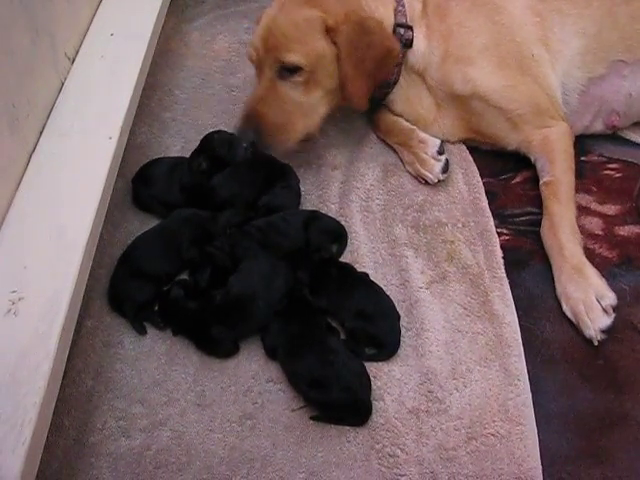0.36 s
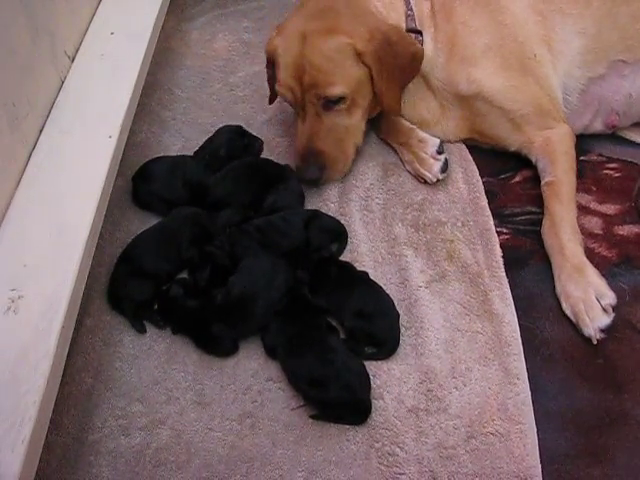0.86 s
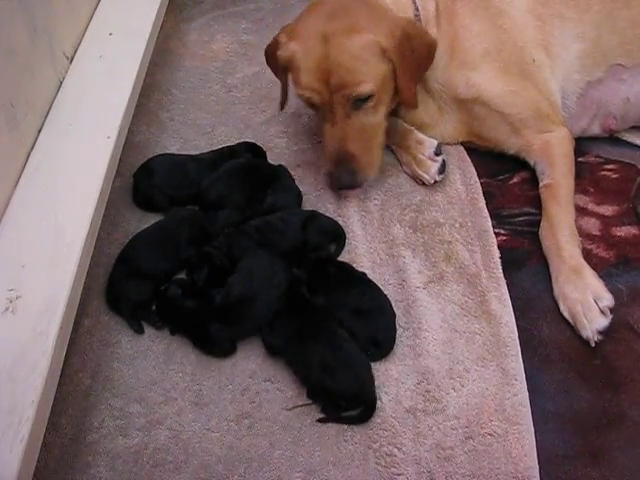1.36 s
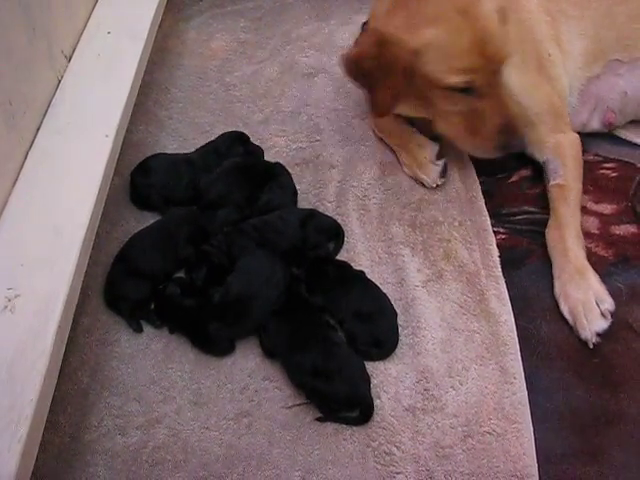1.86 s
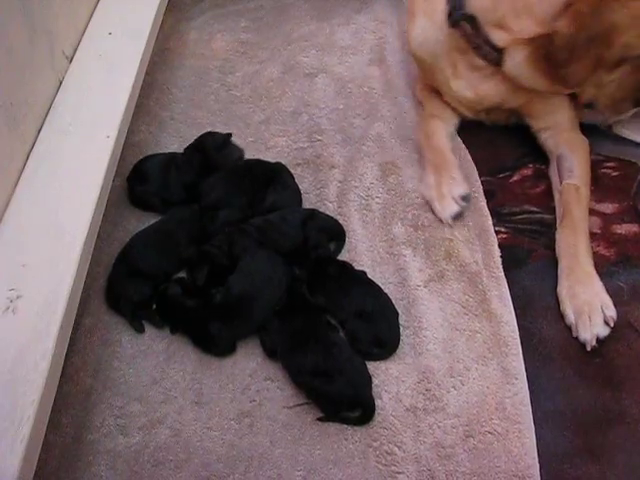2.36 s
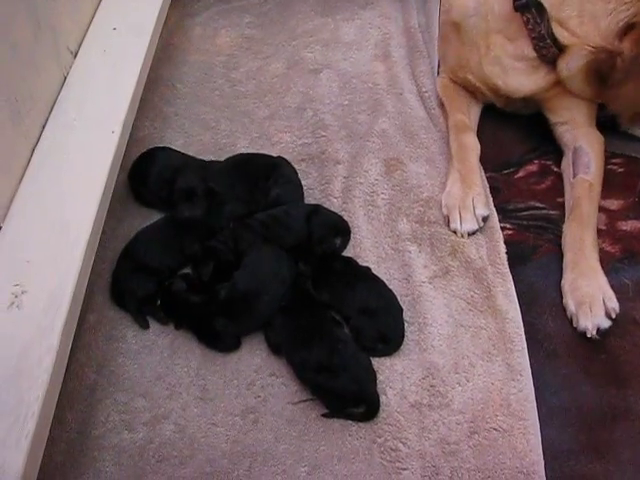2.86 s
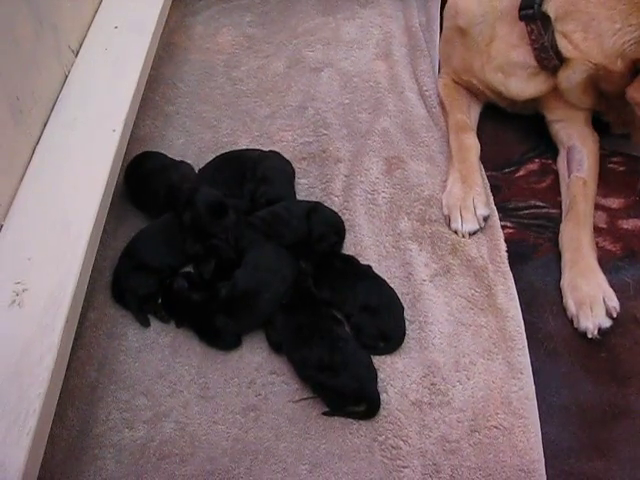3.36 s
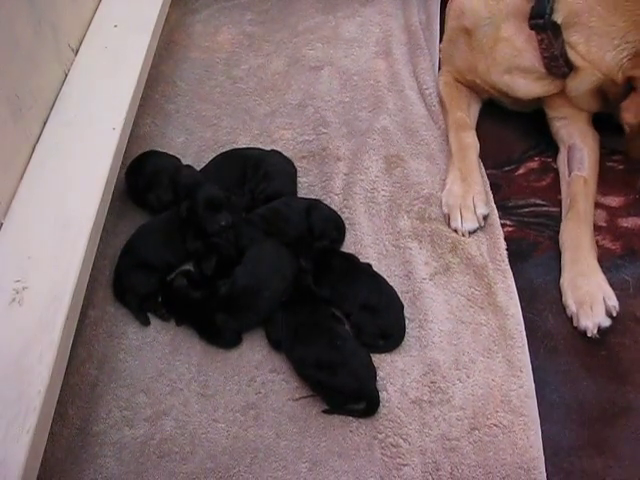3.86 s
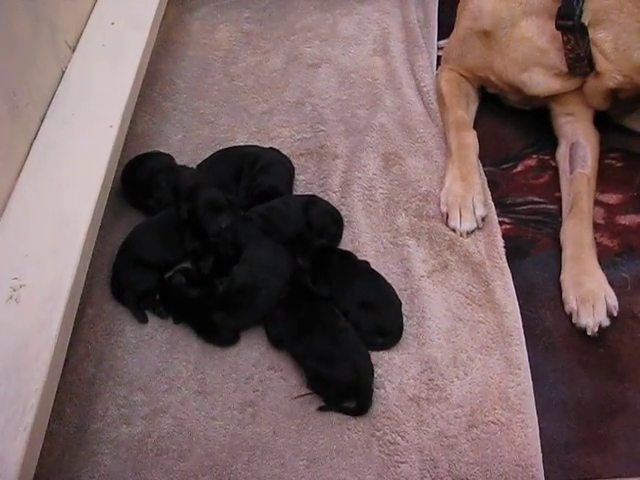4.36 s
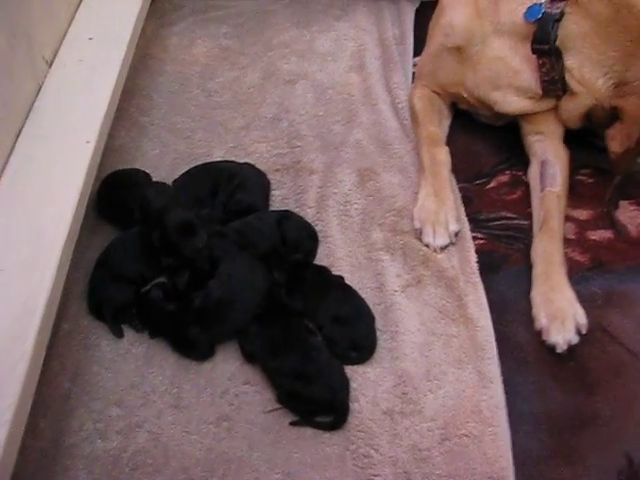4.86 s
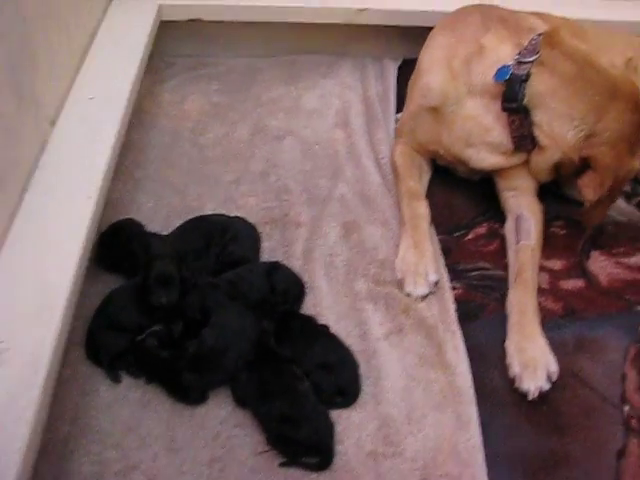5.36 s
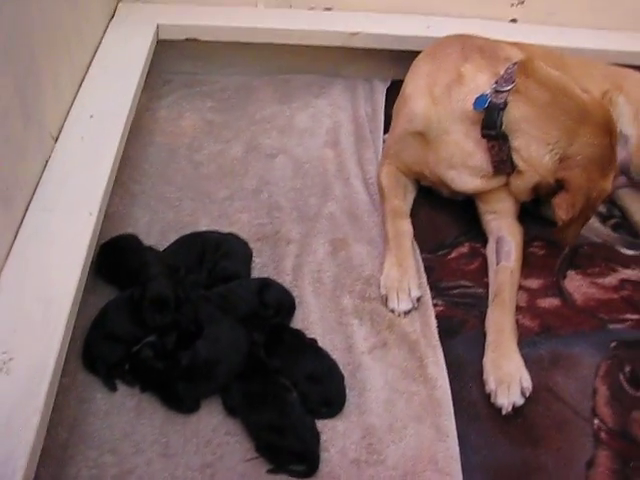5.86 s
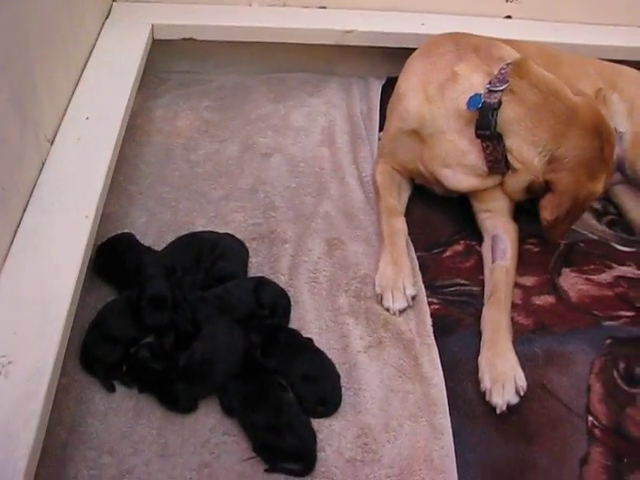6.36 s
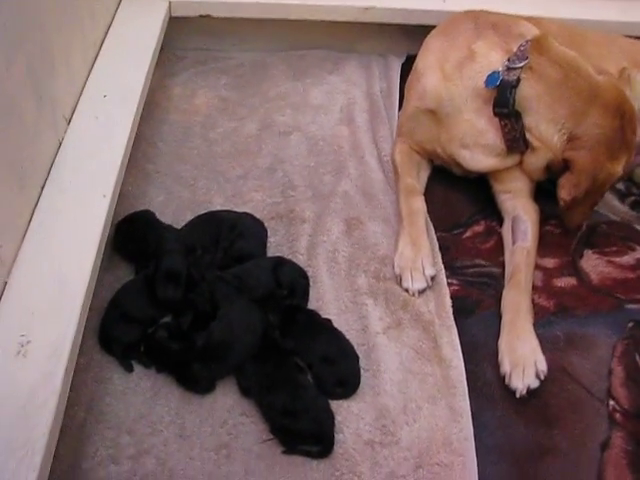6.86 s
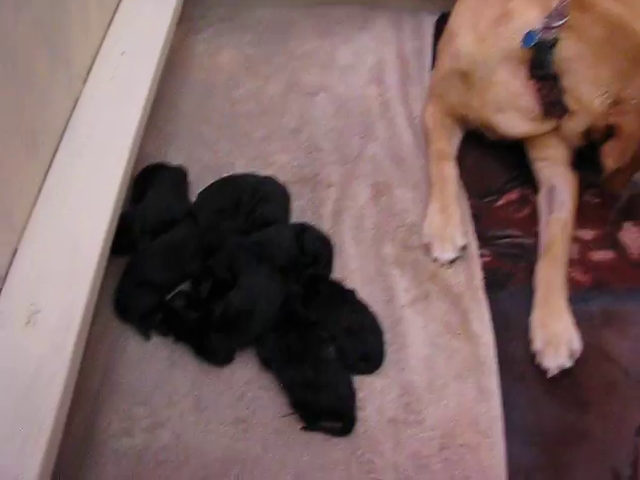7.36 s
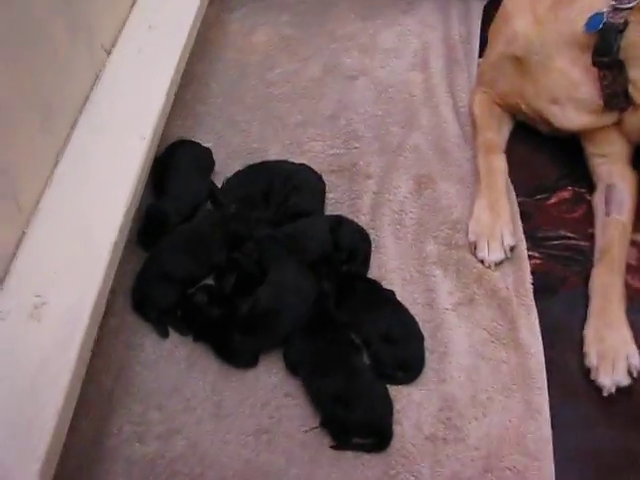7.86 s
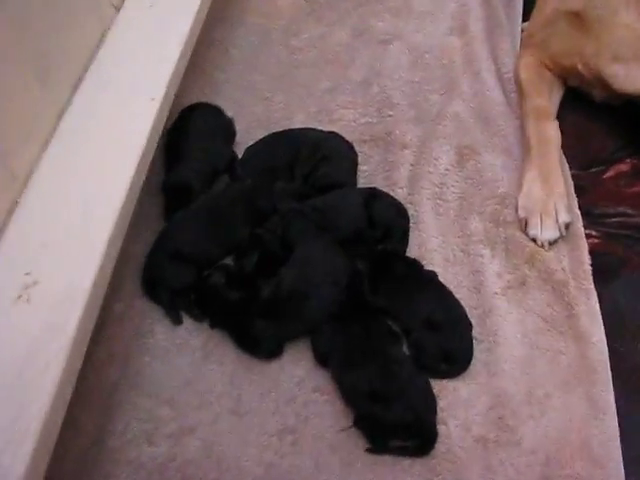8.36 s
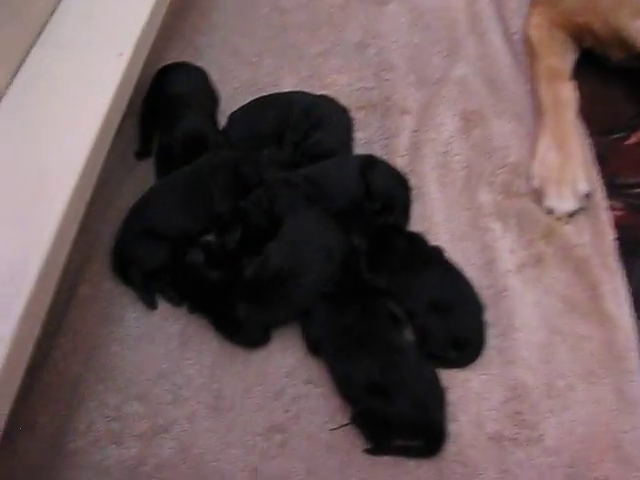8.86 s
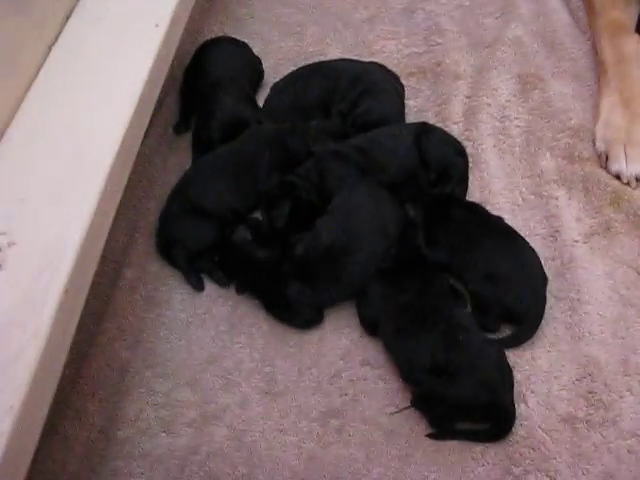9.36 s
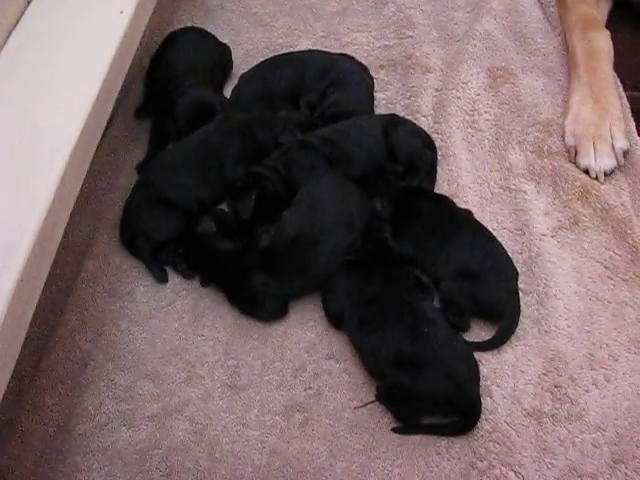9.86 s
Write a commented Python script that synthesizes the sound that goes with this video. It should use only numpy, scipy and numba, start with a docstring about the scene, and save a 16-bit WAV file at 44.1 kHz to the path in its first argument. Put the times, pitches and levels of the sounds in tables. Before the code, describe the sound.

Repeated thin, piercing puppy cries swoop up and down in a small room, over soft hiss, with late taps on boards.

```python
"""A newborn puppy cries again and again from a heap of littermates in a wooden pen.
Each cry is a gliding stack of throat-shaped partials; bursts of noise make it rasp at its peaks.
Taps and knocks are clicks plus ringing board modes; a late dull rustle is fading coloured noise.
Eight coupled delay lines answer as pen walls and room, over shaped hiss, hum lines and a low drone."""
import sys
import numpy as np
from scipy import signal
from scipy.fft import rfft, irfft
from scipy.io import wavfile
from scipy.ndimage import uniform_filter1d
from numba import njit

SR = 44100
rng = np.random.default_rng(int(sys.argv[2]) if len(sys.argv) > 2 else 0)


def int16_out(signal):
    """Quantize to a 16-bit WAV file."""
    q = np.round(np.clip(np.atleast_2d(signal).T, -1, 1) * 32767)
    wavfile.write(sys.argv[1], SR, q.astype(np.int16))


def boost_factor(decibels):
    """Convert a level in decibels to a linear amplitude factor."""
    exponent = np.asarray(decibels, float) / 20
    return 10 ** exponent


N = 440118
T = np.arange(N) / SR

# cries, one list each: (time [s], pitch [Hz], level [dB])
CRY_TRACKS = [
    [(0.04, 327, -38), (0.068, 349.9, -38), (0.104, 386.6, -35), (0.152, 416, -34.5), (0.232, 379, -37),
     (0.26, 375, -56)],
    [(0.64, 355, -51), (0.662, 346, -43.5), (0.708, 309.4, -48), (0.8, 287, -38.5), (0.826, 304, -69),
     (0.84, 327, -51)],
    [(1.01, 390.5, -51), (1.048, 537.5, -36), (1.118, 1664, -21), (1.144, 1614, -27.5),
     (1.192, 1004, -17.5), (1.216, 1104, -22), (1.25, 1694, -29), (1.288, 1842, -22.5), (1.316, 1727, -29),
     (1.352, 1137, -19), (1.416, 707, -25.5), (1.45, 528, -43)],
    [(1.615, 731.1, -37), (1.629, 788.5, -37), (1.649, 1133, -28), (1.689, 1588, -22.5),
     (1.731, 1870, -7.5), (1.759, 1801, -8), (1.853, 1891, -15.5), (1.911, 1871, -13), (2.027, 1756, -25),
     (2.041, 1610, -31.5), (2.065, 1230, -29), (2.09, 790, -42)],
    [(2.25, 459, -43), (2.27, 548.4, -29), (2.32, 1155, -22.5), (2.342, 1305, -17), (2.408, 1358, -12.5),
     (2.456, 1819, -21), (2.5, 2000, -24), (2.582, 1947, -23.5), (2.65, 1820, -34.5), (2.684, 1588, -29.5),
     (2.714, 1082, -17), (2.75, 938, -32.5)],
    [(2.95, 362, -42), (2.964, 480, -26), (3.052, 1693, -20), (3.082, 1240, -12.5), (3.144, 914, -21.5),
     (3.168, 923, -21), (3.208, 1286, -21.5), (3.222, 1382, -21), (3.302, 900, -22), (3.364, 917, -29),
     (3.448, 579, -26), (3.5, 546, -33.5)],
    [(3.69, 307, -46), (3.702, 331, -47), (3.72, 314, -37.5), (3.8, 424.4, -29.5), (3.878, 403, -37),
     (3.93, 347, -31.5), (3.97, 367.2, -64)],
    [(4.17, 281, -45), (4.224, 532.5, -26), (4.266, 735, -22), (4.29, 833, -18), (4.39, 545.6, -24.5),
     (4.458, 650, -23.5), (4.532, 539, -22), (4.544, 559, -33), (4.57, 485, -33)],
    [(4.82, 523.5, -36), (4.848, 663.7, -26.5), (4.884, 1049, -16.5), (4.904, 1239, -19.5),
     (4.952, 940, -17.5), (4.998, 570, -26), (5.036, 501, -32), (5.092, 552, -36.5), (5.14, 508, -42.5)],
    [(5.34, 270.1, -45.5), (5.38, 355.8, -34.5), (5.43, 781, -27), (5.462, 1069, -21), (5.486, 1152, -18.5),
     (5.514, 935, -23), (5.548, 673, -23), (5.592, 539.4, -31), (5.676, 578, -32.5), (5.76, 375, -36)],
    [(5.97, 432.8, -38.5), (5.99, 652, -27.5), (6.038, 1294, -19.5), (6.058, 1508, -15),
     (6.108, 1080, -23.5), (6.136, 1082, -21.5), (6.196, 693, -30), (6.258, 587, -34.5), (6.29, 580, -42)],
    [(6.535, 460, -39), (6.549, 621.2, -32), (6.595, 1260, -20), (6.621, 1503, -16), (6.681, 1480, -16.5),
     (6.729, 1900, -27.5), (6.805, 2020, -28.5), (6.893, 1885, -25), (6.945, 1598, -33),
     (6.959, 1125, -25.5), (6.973, 1120, -40), (6.985, 1040, -40)],
    [(7.18, 907, -43), (7.202, 976, -37.5), (7.236, 1520, -32), (7.28, 1860, -12), (7.3, 2022, -21),
     (7.338, 1854, -12), (7.352, 1930, -20), (7.404, 2140, -19.5), (7.42, 2140, -33.5),
     (7.552, 1942, -35.5), (7.64, 1997, -51), (7.686, 1884, -33.5), (7.838, 1380, -37.5), (7.9, 983, -26.5),
     (8.008, 812, -35), (8.02, 801.3, -44)],
    [(8.28, 451, -41), (8.326, 814, -27.5), (8.356, 1531, -28), (8.45, 1388, -21), (8.528, 1672, -37),
     (8.564, 1597, -30.5), (8.594, 1483, -28), (8.65, 890, -27), (8.706, 664, -34), (8.735, 532, -33)],
    [(8.875, 365.6, -43), (8.903, 614, -28.5), (8.939, 1012, -26), (8.985, 1394, -24.5),
     (9.043, 1280, -24.5), (9.087, 1308, -25.5), (9.139, 1195, -29.5), (9.243, 622, -30), (9.265, 474, -36)],
    [(9.44, 319, -37.5), (9.462, 456, -30), (9.524, 1026, -23), (9.56, 1248, -30), (9.592, 1032, -22),
     (9.608, 833, -23), (9.696, 510, -25.5), (9.73, 423, -41)],
    [(9.92, 375, -38), (9.938, 443, -42), (9.958, 476, -31), (9.975, 610, -26.5)],
]
# short low croak across one cry: (time [s], pitch [Hz], level [dB])
CROAK_TRACK = [(8.39, 423, -52), (8.4, 422.5, -21), (8.423, 407, -17.5), (8.435, 396, -43)]
# mouth and throat, one row a cry, croak last: (second partial lift [dB], throat tilt [dB/octave],
# treble over middle level [dB], treble slope [dB/octave], nose hiss [dB])
MOUTH_SETTINGS = [(-4.5, -2.5, -23, -2, -54), (-3, 0, -30, 12, -74), (-9.5, 1, -31, 5, -52),
                  (-5, -13, -23, -9, -54), (0, -2, -17.5, -4, -57), (8, -8.5, -25.5, 4.5, -48.5),
                  (1, 1.5, -32, -4, -60), (5.5, 0, -24.5, 1, -64), (1.5, -2, -25, -10, -55),
                  (2, -2, -28, 4, -55), (2, -1, -26.5, 19, -55), (4, -1, -25, 2, -57),
                  (-6, -15, -29, -10, -62.5), (-4.5, -9, -29.5, -9, -52), (-9.5, -4.5, -32, -1.5, -71),
                  (-12, -9.5, -32, -17, -58), (-14, -10, -27, 4, -76), (2, 2, -26, -40, -70)]
# vocal folds lose their beat: (start [s], length [s], level [dB], 3 kHz crown over that level [dB])
RASP_EVENTS = [(1.056, 0.073, -33.5, -50), (1.128, 0.24, -44.5, -26), (1.71, 0.057, -42, -5),
               (2.283, 0.11, -30, -6), (3.02, 0.056, -39, -24), (4.894, 0.034, -34, 7),
               (4.91, 0.076, -27.5, -0.5), (4.969, 0.17, -33.5, -30), (5.488, 0.052, -27, 8.5),
               (6.074, 0.066, -28.5, -7), (6.119, 0.098, -32.5, -24), (6.954, 0.018, -33, 4),
               (8.387, 0.034, -30, -3), (8.429, 0.072, -26, 3), (8.979, 0.073, -30, 6.5),
               (9.558, 0.038, -35, -8)]
# every second pulse weakens, lines appear between partials: (start [s], length [s], depth [0-1])
PULSE_HALVINGS = [(1.721, 0.031, 0.67)]
# mouth gapes and the treble comes out: (start [s], length [s], treble lift [dB])
MOUTH_GAPES = [(1.672, 0.39, 19.5), (2.258, 0.22, 8.5), (4.94, 0.041, 17.5), (7.24, 0.17, 26.5),
               (8.364, 0.345, 15.5), (8.934, 0.28, 23.5), (9.575, 0.06, 12.5)]
# second partial over the fundamental, by pitch: (pitch [Hz], level [dB])
SECOND_PARTIAL = [(300, -25), (355, -12), (415, 10), (480, 4.5), (580, 4), (700, 4), (850, -4), (1050, -8),
                  (1300, -9.5), (1600, -5.5), (1850, -14.5), (2100, -16)]
# throat resonances: (frequency [Hz], level [dB])
THROAT_SPECTRUM = [(300, -33), (800, 6.5), (1200, 7), (2000, 2), (2800, -4.5), (3600, -23), (4300, -26),
                   (5200, -54)]
# treble resonances of the mouth: (frequency [Hz], level [dB])
TREBLE_SPECTRUM = [(4400, -35), (5000, -8), (5700, 3.5), (6800, -7), (8000, -7.5), (9500, -6),
                   (11500, -0.5), (13500, -6.5), (15800, -60)]
# resonance that a hard rasp lights up: (frequency [Hz], level [dB])
CROWN_SPECTRUM = [(1500, -44), (2300, -41), (3000, -7.5), (3600, -7), (4200, -36)]
# nose hiss: (frequency [Hz], level [dB])
NOSE_SPECTRUM = [(7000, -17), (9500, -7), (12000, -2), (14000, -5), (15800, -11.5)]
# taps and knocks: (time [s], tick [dB], clack [dB], thud [dB])
KNOCK_EVENTS = [(.272, -33, -46, -29.5), (0.795, -29, -61, -46), (3.983, -37, -42, -66),
                (5.391, -18, -22, -52), (5.916, -47, -39.5, -38.5), (8.002, -56, -58, -42),
                (8.463, -38, -21.5, -15), (8.521, -60, -48, -22.5), (8.566, -60, -50, -27),
                (8.605, -56, -28, -41), (8.662, -62, -50, -38), (8.697, -56, -40, -26.5),
                (8.758, -46, -33, -31.5), (8.8037, -17, -14.5, -21.5), (8.878, -60, -47, -45),
                (8.969, -14, -29, -32.5), (9.351, -46, -40.5, -66), (9.592, -50, -40, -45)]
# modes of the boards: (frequency [Hz], level [dB], t60 [s])
BOARD_MODES = [(88, -19, 0.19), (235, -4, 0.08), (390, 11.5, 0.032), (474, 8, 0.034), (630, 4, 0.036),
               (943, -4, 0.052), (1490, 4, 0.028), (1760, 1, 0.024), (1937, -0.5, 0.032),
               (2830, 6.5, 0.016), (3530, -6, 0.014), (3640, 1.5, 0.021)]
# rustle: (frequency [Hz], level [dB])
SHUFFLE_SPECTRUM = [(50, -27), (85, 3.5), (150, -7), (350, -2.5), (800, -10), (1500, -9), (3000, -42)]
# background hiss: (frequency [Hz], relative density [dB per Hz])
HISS_SPECTRUM = [(15, -22), (25, -7.5), (194, -11), (500, -11), (557, -11), (929, -10.5), (1120, -13),
                 (1390, -14), (1930, -13), (2090, -16), (3130, -21.5), (3990, -25.5), (15800, -38)]
# hiss correlation between the ports: (frequency [Hz], likeness [0-1])
PORT_LIKENESS = [(60, 0.78), (130, 0.88), (290, 0.93), (640, 0.89), (1410, 0.7), (3100, 0.52), (6820, 0.13),
                 (15000, 0.1)]
# household hum lines: (frequency [Hz], level [dB])
HUM_LINES = [(80.7, -63.5), (120, -61), (196, -65.5), (222, -70.5), (360, -60.5)]
# low drone: (time [s], level before a fixed 2.5 dB lift [dB])
DRONE_LEVEL = [(0.0, -55), (2.0, -61), (2.3, -54.5), (7.1, -52), (9.98, -56.5)]
# port balance: (frequency [Hz], left minus right [dB])
PORT_BALANCE = [(60, -3), (110, -1.5), (200, -1.0), (380, -2.0), (700, -2.5), (1290, -1), (2380, -8.5),
                (4400, -2), (5600, 2.5), (8120, 0.5), (15000, 0)]
# phase lead of the left port: (frequency [Hz], lead [rad])
PORT_LEAD = [(100, 0), (1000, 0.024), (2500, 0.77), (4000, 1.92), (5600, 1.5), (8000, 1.34), (15000, 1.92)]
# wall delays: (delay [ms])
WALL_DELAYS_MS = [2.3, 3.7, 5.9, 8.3, 13.1, 17.9, 23.3, 31.7]

JITTER, SHIMMER_DB, BREATH_DB = 0.0035, 4.5, -59
GAPE_EASE_S = 0.02
SECOND_PER_GAPE_DB, TILT_PER_GAPE_DB, RASP_TREBLE_PER_GAPE_DB = 0.57, 0.5653, 0.55  # per dB of gape
TREBLE_FOLLOWS, MIDDLE_DB = 0.81, -28.5  # share of a swell around the middle level that treble follows
RASP_TREBLE_DB, SCATTER_DB = -25, -3.5  # over the rasp level: its treble; its share of pitch scatter
CROWN_AIR_DB = -14  # air in the crown resonance over the partials that pass it
SHUFFLE_S, SHUFFLE_END_S, SHUFFLE_DB, SHUFFLE_FADE_DB_PER_S = 8.46, 9.15, -40, 20
HISS_DB = -46.5
ROOM_T60_S, ROOM_DAMP, ROOM_DB = 0.23, 0.48, -12
CEILING_DB, RELEASE_S, RATIO = -9, 0.81, 2.38


def on_log(table, hz):
    """Read a (Hz, value) table on a log-frequency axis."""
    f, value = np.transpose(table)
    return np.interp(np.log(np.maximum(hz, 1)), np.log(f), value)


def colour(x, table):
    """Shape noise with a (Hz, dB) spectrum, scaled to rms 1."""
    shape = boost_factor(on_log(table, np.fft.rfftfreq(len(x), 1 / SR)))
    y = irfft(rfft(x) * shape, len(x))
    return y / np.std(y)


def walk(rate_hz, size):
    """Random levels held for 1 / rate_hz seconds, smoothed twice."""
    hold = int(SR / rate_hz)
    steps = np.repeat(rng.standard_normal(size // hold + 1), hold)
    return 1.5 * uniform_filter1d(uniform_filter1d(steps, hold), hold)[:size]


def gate(t, start, length):
    """Quick rise and slower fall around a stretch of time."""
    rise = np.clip((t - start) / 0.00837, 0, 1)
    fall = np.clip((start + length - t) / 0.0144, 0, 1)
    return rise * fall


def ports(x):
    """Two microphone ports: level and phase differences that change with frequency."""
    f = np.fft.rfftfreq(N, 1 / SR)
    half = boost_factor(on_log(PORT_BALANCE, f) / 2) * np.exp(0.5j * on_log(PORT_LEAD, f))
    return irfft(rfft(x) * np.array([half, 1 / half]), N)


def hiss():
    """Smooth noise, more alike at the two ports in the bass than in the treble."""
    f = np.fft.rfftfreq(N, 1 / SR)
    likeness = np.clip(on_log(PORT_LIKENESS, f), 0, 0.99)
    mid, side = (rfft(colour(rng.standard_normal(N), HISS_SPECTRUM)) for _ in range(2))
    balance = boost_factor(on_log(PORT_BALANCE, f) * np.array([[0.5], [-0.5]]))
    common = mid * np.sqrt(1 + likeness)
    opposed = side * np.sqrt(1 - likeness) * np.array([[1], [-1]])
    noise = irfft(balance * (common + opposed), N) / np.sqrt(2)
    return boost_factor(HISS_DB + 1.4 * walk(2.556, N)) * noise


def hum():
    """Household hum: sine lines that waver in level and frequency."""
    out = np.zeros(N)
    for hz, db in HUM_LINES:
        level = boost_factor(db + 2 * walk(8, N))
        out += level * np.sin(2 * np.pi * np.cumsum(hz + 2.5 * walk(3.1, N)) / SR)
    return out


def drone():
    """One wavering sine near 40 Hz on a slow level curve."""
    level = boost_factor(np.interp(T, *np.transpose(DRONE_LEVEL)) + 2.5 + 1.5 * walk(8, N))
    return level * np.sin(2 * np.pi * np.cumsum(40.5 + 1.2 * walk(4, N)) / SR)


def background():
    """Hiss with hum and drone, at both ports."""
    return hiss() + ports(hum() + drone())


def gape(t):
    """How far the open mouth lifts the treble, in dB."""
    out = np.zeros(len(t))
    for start, length, lift_db in MOUTH_GAPES:
        out += lift_db * np.clip(np.minimum(t - start, start + length - t) / GAPE_EASE_S, 0, 1)
    return out


def cry(rows, second_db, tilt_db, treble_db, slope_db, nose_db):
    """Partials on one unsteady pitch; throat shapes the low ones, mouth the high ones; nose adds hiss."""
    s, *columns = np.transpose(rows)
    a, b = int(s[0] * SR), min(int((s[-1] + 0.0027) * SR), N)
    t, size = T[a:b], b - a
    hz, db = (uniform_filter1d(np.interp(t, s, c), size=450, mode="nearest") for c in columns)
    open_db = gape(t)

    # rasps scatter the pitch and strain the crown resonance
    scatter, strain = np.zeros(size), np.zeros(size)
    for start, length, rasp_db, crown_db in RASP_EVENTS:
        active = gate(t, start, length)
        scatter += boost_factor(rasp_db + SCATTER_DB) * active
        strain += boost_factor(rasp_db + crown_db) * active
    unsteady_hz = hz * (1 + JITTER * walk(150, size) + scatter * walk(500, size))
    phase = 2 * np.pi * np.cumsum(unsteady_hz) / SR

    k = np.arange(2, 40)[:, None]
    partial_hz = k * hz
    lift_db = second_db + on_log(SECOND_PARTIAL, hz) + SECOND_PER_GAPE_DB * open_db
    throat_db = on_log(THROAT_SPECTRUM, partial_hz) - on_log(THROAT_SPECTRUM, 2 * hz)
    low = boost_factor(lift_db + throat_db + (tilt_db + TILT_PER_GAPE_DB * open_db) * np.log2(k / 2))
    # fundamental and low partials share the level of the cry
    first = 1 / np.sqrt(1 + (low ** 2).sum(axis=0))
    low = low * first + strain * boost_factor(on_log(CROWN_SPECTRUM, partial_hz) - db)

    high = boost_factor(on_log(TREBLE_SPECTRUM, partial_hz) + slope_db * np.log2(partial_hz / 8000))
    high = high * (partial_hz > 4400) * (partial_hz < 16000)
    high_db = treble_db + open_db - (1 - TREBLE_FOLLOWS) * (db - MIDDLE_DB)
    high = high * boost_factor(high_db) / np.sqrt((high ** 2).sum(axis=0) + 1e-9)

    # six flutters shared out among the partials: mostly dips, deeper at high pitch
    dips = np.minimum([walk(85.27, size) for _ in range(6)], 0.9)
    flutter = boost_factor(SHIMMER_DB * np.clip(hz / 1100, 0.3, 1) * dips)
    level = np.where(k == 2, low, np.hypot(low, high)) * flutter[1 + k[:, 0] % 5]
    upper = (level * np.sin(k * phase + k ** 2 / 3)).sum(axis=0)
    for start, length, depth in PULSE_HALVINGS:
        upper = upper * (1 + depth * gate(t, start, length) * np.cos(phase / 2))

    # air leaks past the folds once a cycle
    air = colour(rng.standard_normal(size), THROAT_SPECTRUM)
    breath = boost_factor(BREATH_DB) * (1 + np.cos(phase)) * air
    voice = first * np.sin(phase) * flutter[0] + upper + breath
    edges = np.clip(np.minimum(t - t[0], t[-1] - t) / 0.0045, 0, 1)

    arch = np.abs(np.sin(np.pi * (t - t[0]) / (t[-1] - t[0]))) ** 0.5
    nose = colour(rng.standard_normal(size), NOSE_SPECTRUM)
    nose = boost_factor(nose_db + 3.7 * walk(24.4, size)) * nose * arch
    out = np.zeros(N)
    out[a:b] = voice * np.sqrt(2) * boost_factor(db) * edges + nose
    return out


def cries():
    """All cries and the croak, each with its own mouth."""
    return sum(cry(rows, *mouth) for rows, mouth in zip(CRY_TRACKS + [CROAK_TRACK], MOUTH_SETTINGS))


def knocks():
    """Tick, crack and clack of the upper board modes; 2 ms later the duller ring of the lower ones."""
    size = 8000
    out, t = np.zeros(N + size), T[:size]
    late = np.maximum(t - 0.002, 0)
    tick_filter = signal.butter(2, 2000, "high", fs=SR, output="sos")
    crack_filter = signal.butter(1, [500, 4500], "band", fs=SR, output="sos")
    for s, tick_db, clack_db, thud_db in KNOCK_EVENTS:
        click = rng.standard_normal(size) * np.exp(-t / 0.00053) + 3 * (t == 0)
        tick = signal.sosfilt(tick_filter, click)
        crack = signal.sosfilt(crack_filter, rng.standard_normal(size)) * np.exp(-t / 0.0028)
        blow = boost_factor(tick_db) * tick + boost_factor(clack_db + 4.5) * crack
        chance = rng.standard_normal((len(BOARD_MODES), 2))
        for (hz, db, t60_s), (detune, spread) in zip(BOARD_MODES, chance):
            u, part_db = (t, clack_db) if hz > 1200 else (late, thud_db)
            ring = np.sin(2 * np.pi * hz * (1 + 0.033 * detune) * u)
            envelope = np.exp(-np.log(1000) * u / t60_s) * (1 - np.exp(-u * hz))
            blow += boost_factor(part_db + db + 3.2 * spread) * ring * envelope
        i = int(s * SR)
        out[i:i + size] += blow
    return out[:N]


def rasps():
    """Irregular decaying bursts of air through throat, crown and treble resonances."""
    out = np.zeros(N)
    for s, length, db, crown_db in RASP_EVENTS:
        a = int(s * SR)
        t = T[a:a + 6000]
        air = rng.standard_normal(len(t)) * boost_factor(2.2 * walk(400, len(t))) * np.exp(-(t - s) / 0.063)
        treble_db = RASP_TREBLE_DB + RASP_TREBLE_PER_GAPE_DB * gape(t)
        burst = colour(air, THROAT_SPECTRUM)
        burst += boost_factor(crown_db + CROWN_AIR_DB) * colour(air, CROWN_SPECTRUM)
        burst += boost_factor(treble_db) * colour(air, TREBLE_SPECTRUM)
        out[a:a + 6000] += gate(t, s, length) * boost_factor(db) * burst
    return out


def shuffle():
    """Rubbing on the boards: dull uneven noise that sets in at once and fades."""
    level_db = SHUFFLE_DB - SHUFFLE_FADE_DB_PER_S * (T - SHUFFLE_S) + 4 * walk(40, N)
    rustle = colour(rng.standard_normal(N), SHUFFLE_SPECTRUM)
    return gate(T, SHUFFLE_S, SHUFFLE_END_S - SHUFFLE_S) * boost_factor(level_db) * rustle


@njit
def walls(x, lags, gain, damp):
    """Eight delay lines that feed each other, duller on every round."""
    line, soft, out = np.zeros((8, 2048)), np.zeros(8), np.zeros((2, len(x)))
    for i in range(len(x)):
        total = 0.
        for k in range(8):
            soft[k] += (1 - damp) * (gain[k] * line[k, (i - lags[k]) & 2047] - soft[k])
            total += soft[k]
            out[k % 2, i] += soft[k]
        for k in range(8):
            line[k, i & 2047] = x[i] + soft[k] - total / 4
    return out


def room(near):
    """Wall echoes decaying over ROOM_T60_S, narrowed because close ports hear much the same room."""
    lags = (np.array(WALL_DELAYS_MS) * SR / 1000).astype(np.int64)
    echoes = walls(near + 1e-18, lags, boost_factor(-60 * lags / SR / ROOM_T60_S), ROOM_DAMP)
    centre = echoes.mean(axis=0)
    return boost_factor(ROOM_DB) * (centre + 0.37 * (echoes - centre))


def scene():
    """Voices, knocks and rustle reach the ports directly and by way of the walls."""
    near = cries() + knocks() + rasps() + shuffle()
    return ports(near) + room(near) + background()


@njit
def follow(x, attack, release):
    """Level follower that rises fast and falls slowly."""
    e, out = 0., np.empty(len(x))
    for i in range(len(x)):
        e += (x[i] - e) * (attack if x[i] > e else release)
        out[i] = e
    return out


def band_limit(x):
    """A steep low-pass at the top of the band."""
    return signal.sosfilt(signal.butter(12, 16520, fs=SR, output="sos"), x)


def record(dry):
    """Gain control pulls loud cries down and lets go slowly; a steep low-pass cuts the top."""
    level = follow(np.abs(dry).max(axis=0), 1 / (0.0027 * SR), 1 / (RELEASE_S * SR))
    gain = np.minimum(1, boost_factor(CEILING_DB) / (level + 1e-9)) ** (1 - 1 / RATIO)
    low_pass = signal.ellip(8, 0.2, 60, 15800, fs=SR, output="sos")
    mix = signal.sosfilt(low_pass, dry * gain)
    return band_limit(mix)


dry = scene()
out = record(dry)
int16_out(out)
```